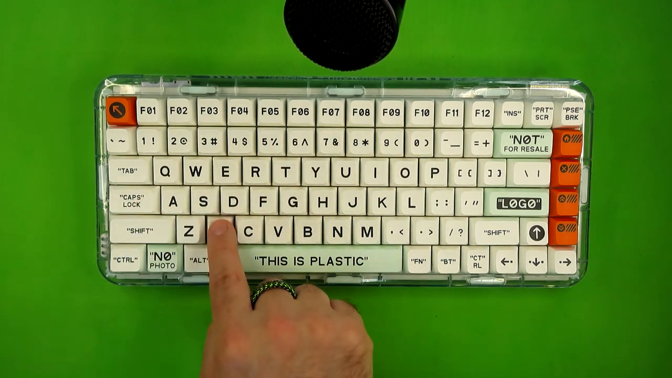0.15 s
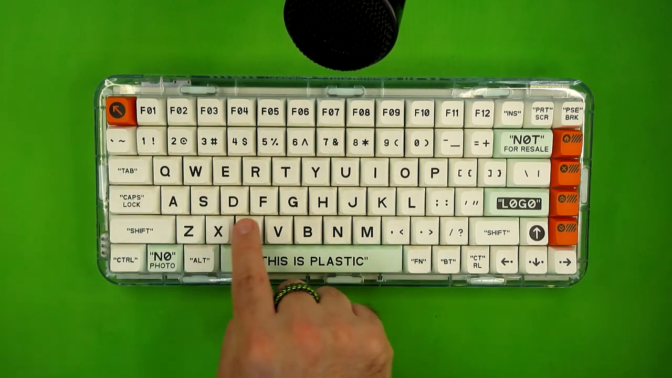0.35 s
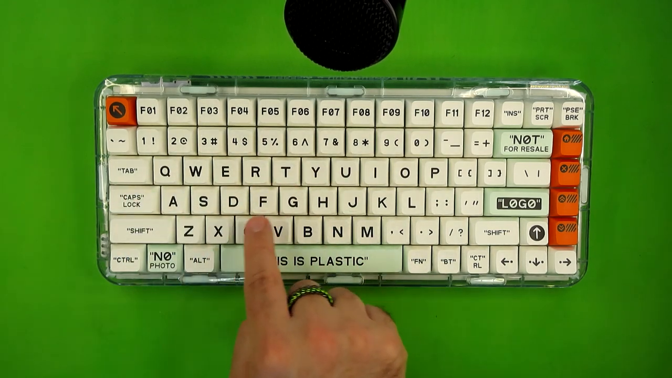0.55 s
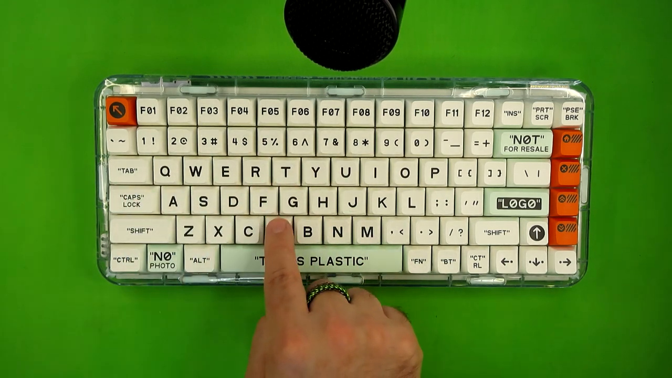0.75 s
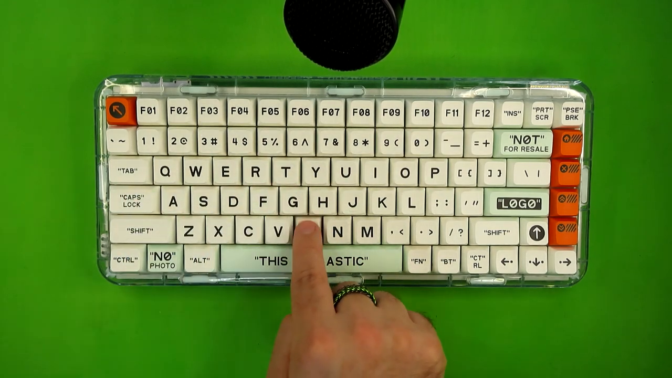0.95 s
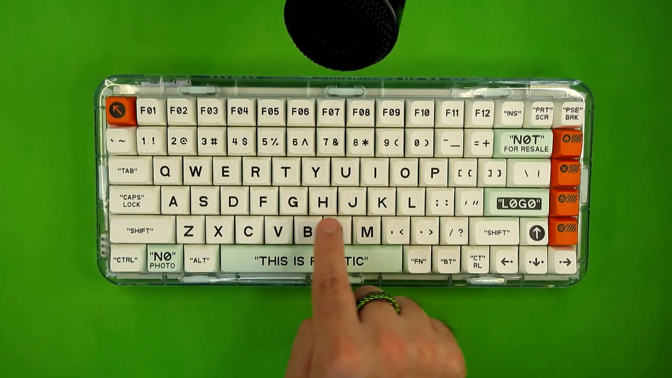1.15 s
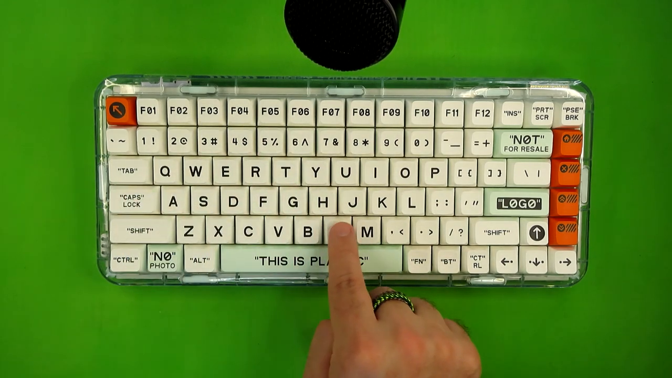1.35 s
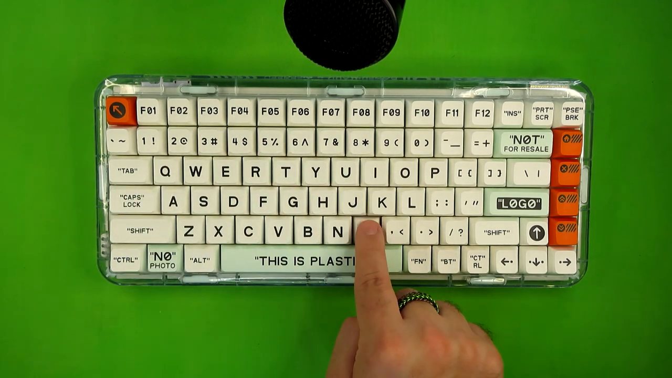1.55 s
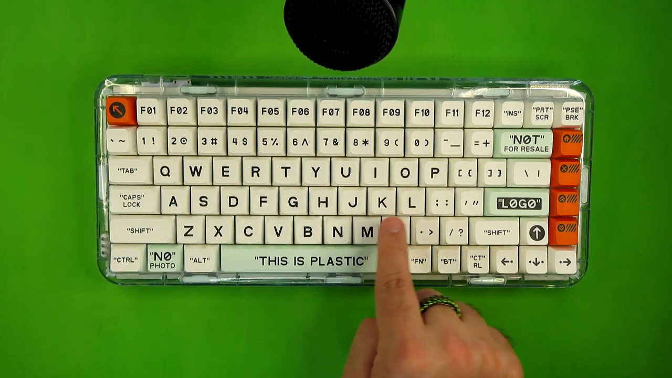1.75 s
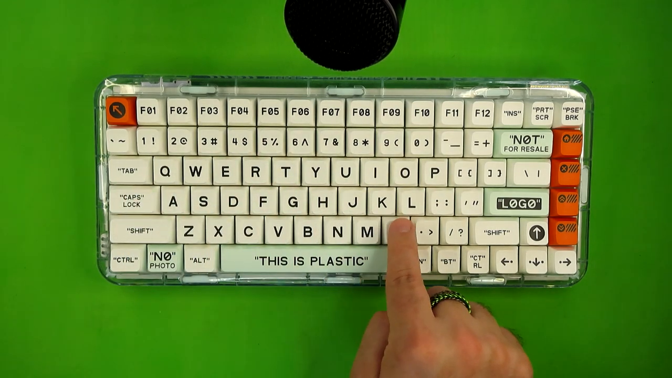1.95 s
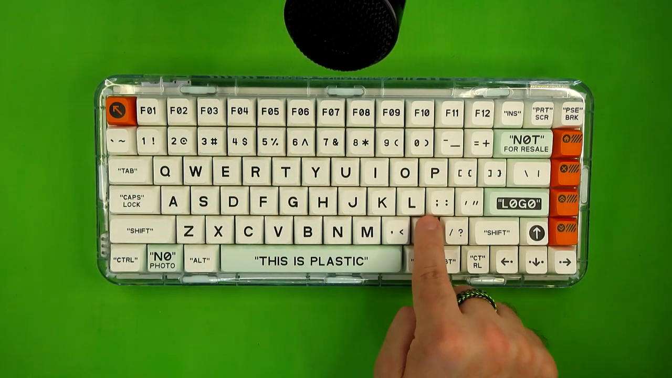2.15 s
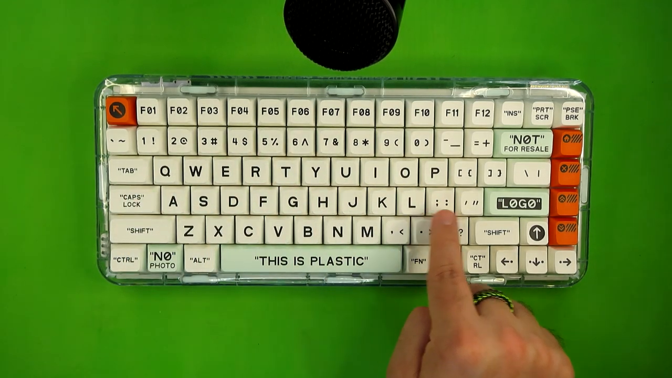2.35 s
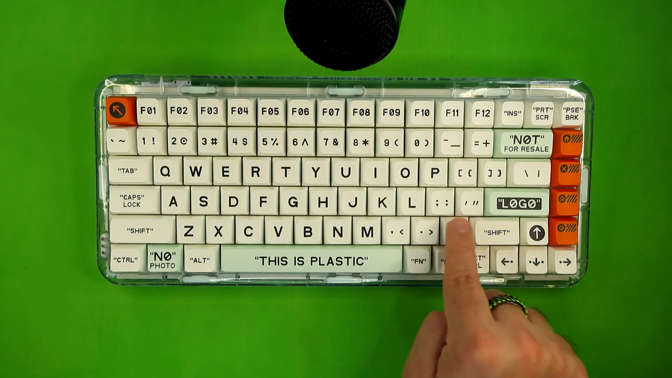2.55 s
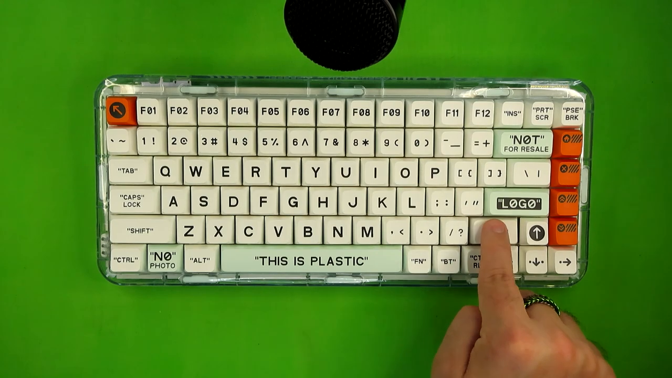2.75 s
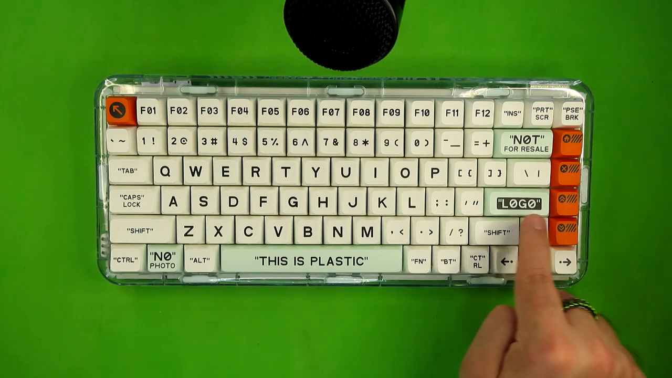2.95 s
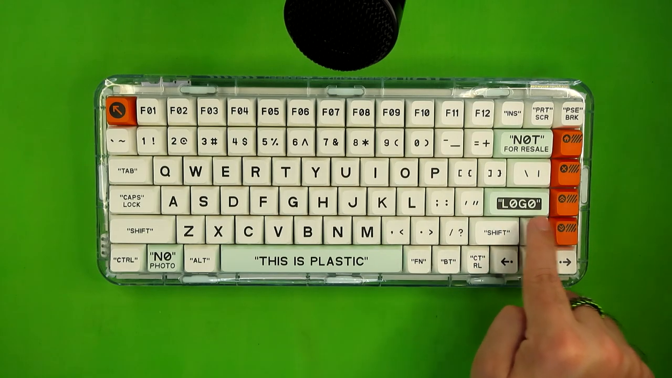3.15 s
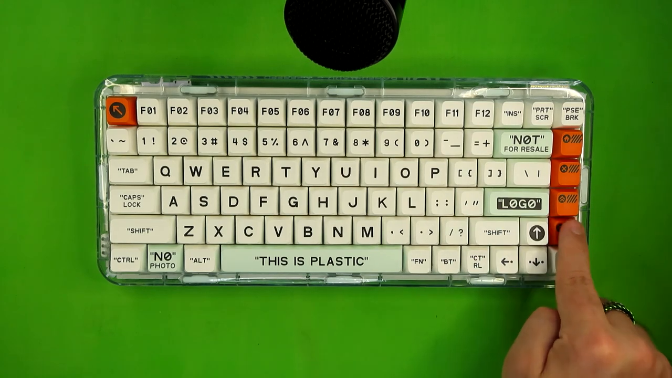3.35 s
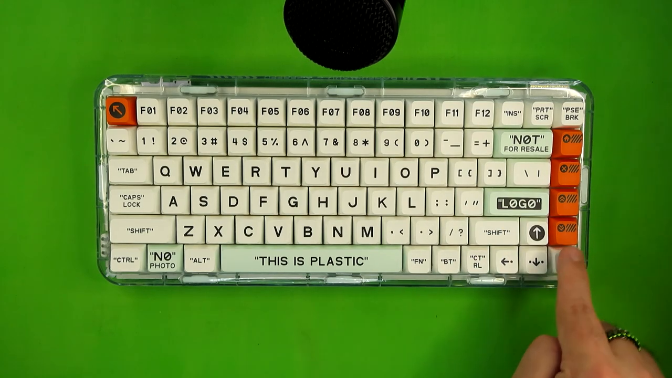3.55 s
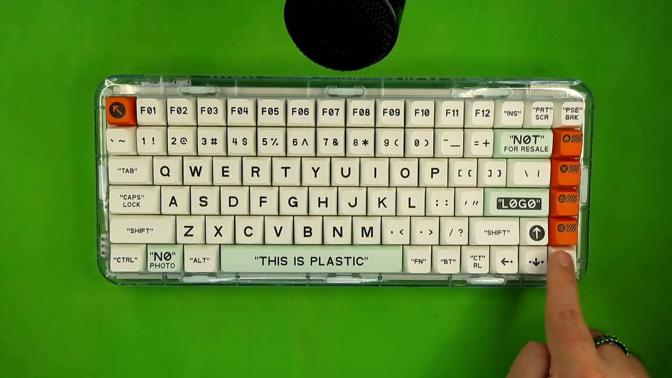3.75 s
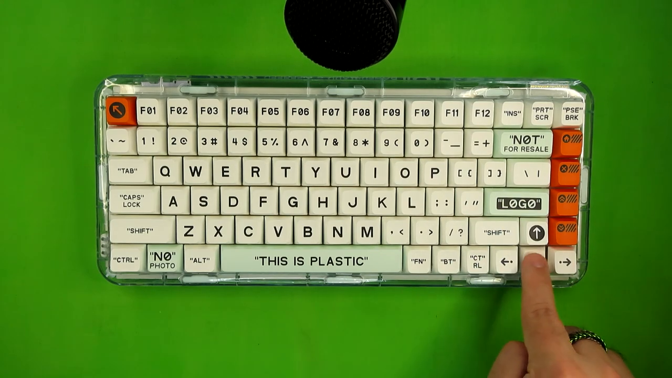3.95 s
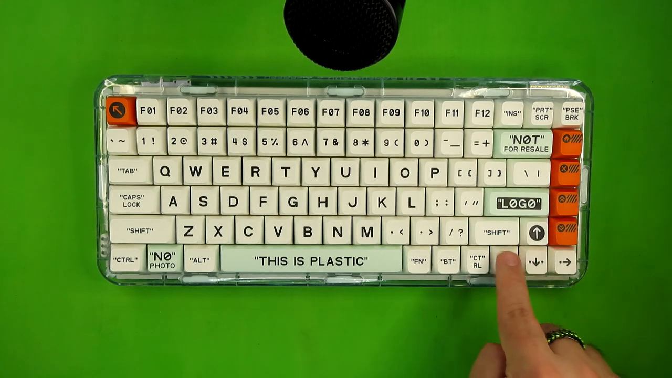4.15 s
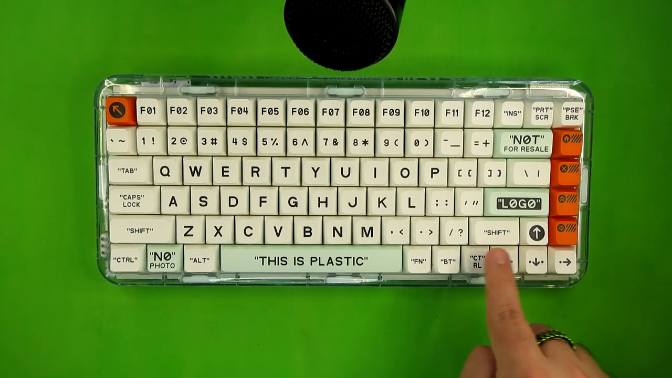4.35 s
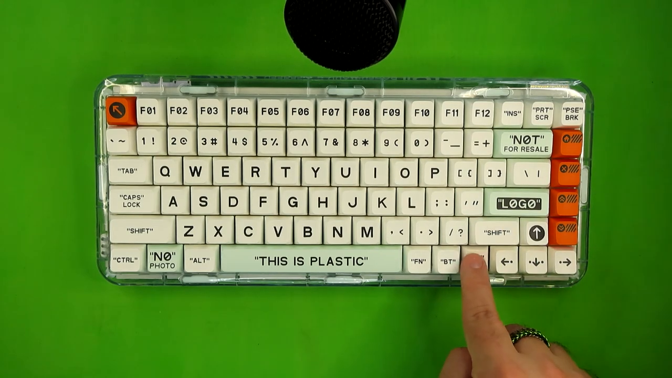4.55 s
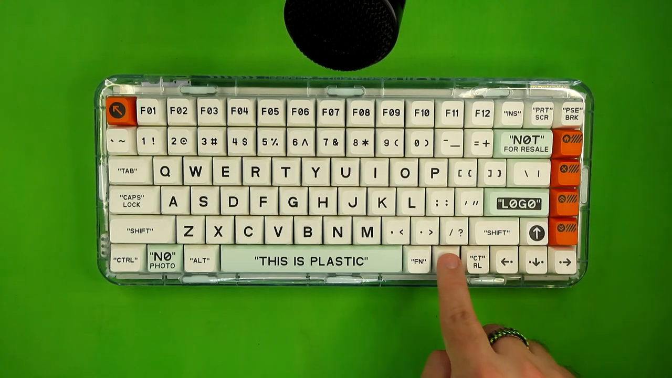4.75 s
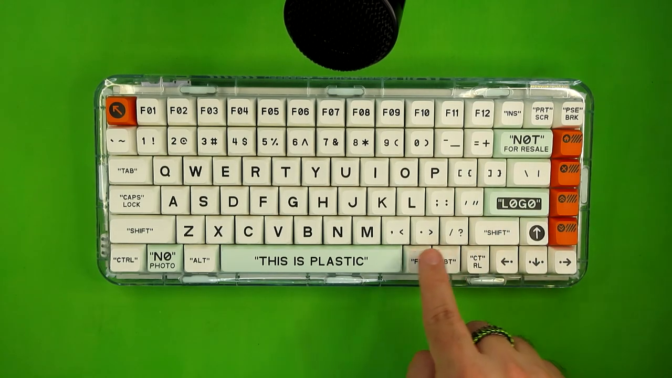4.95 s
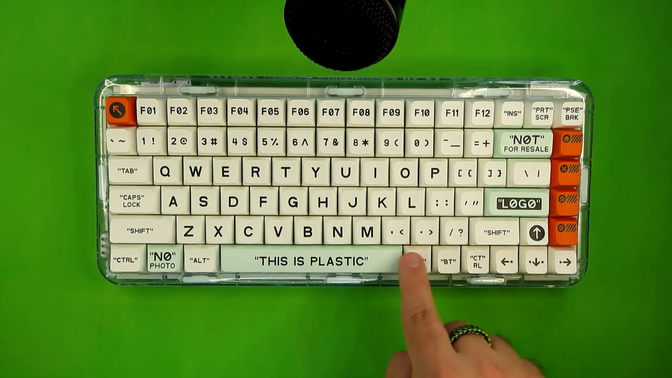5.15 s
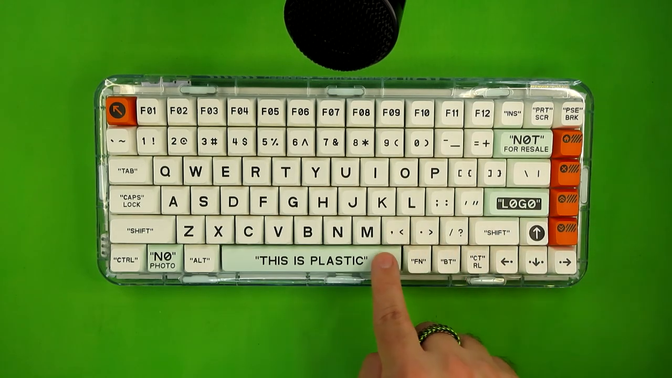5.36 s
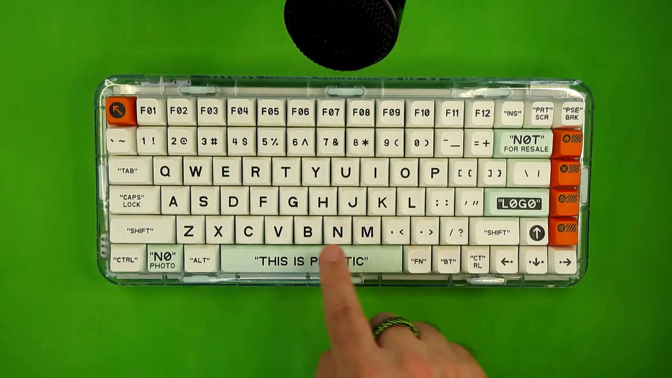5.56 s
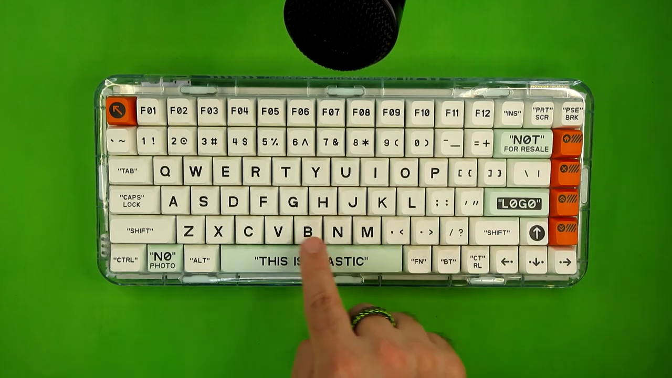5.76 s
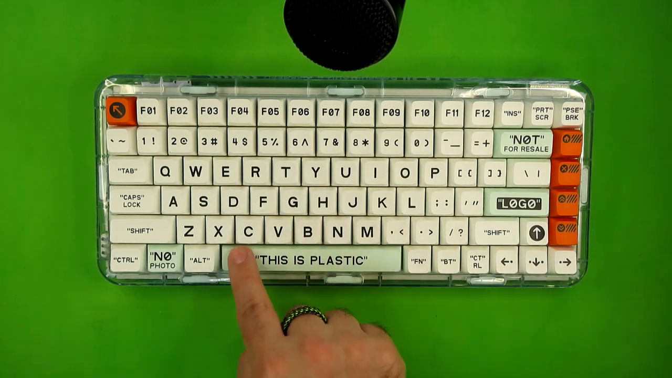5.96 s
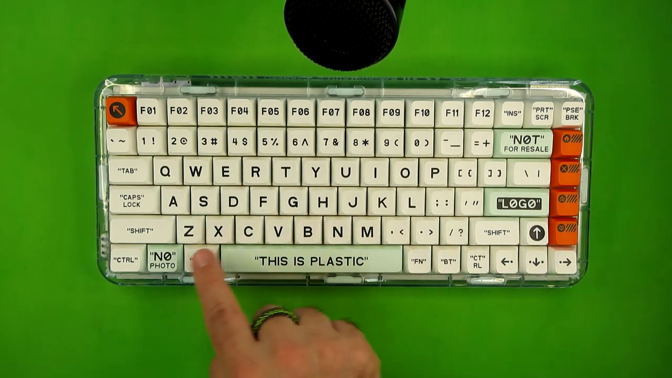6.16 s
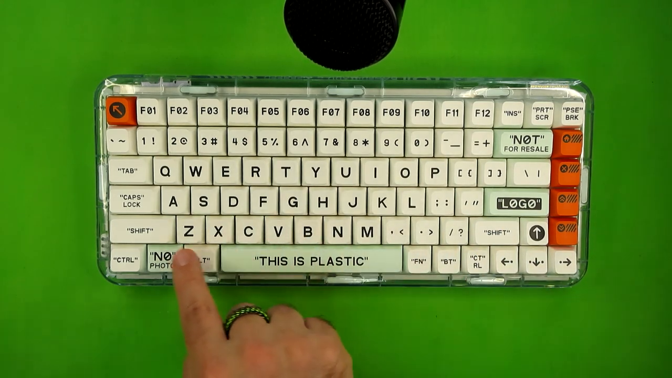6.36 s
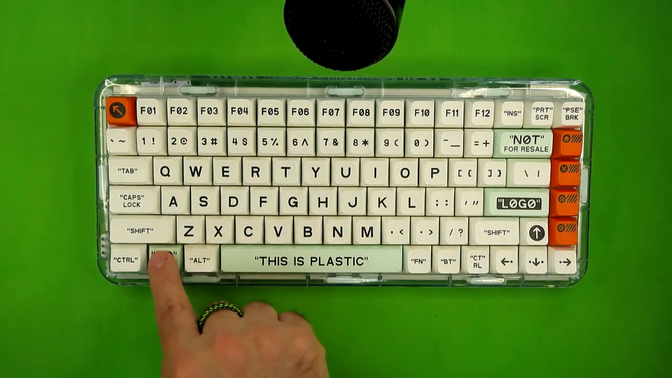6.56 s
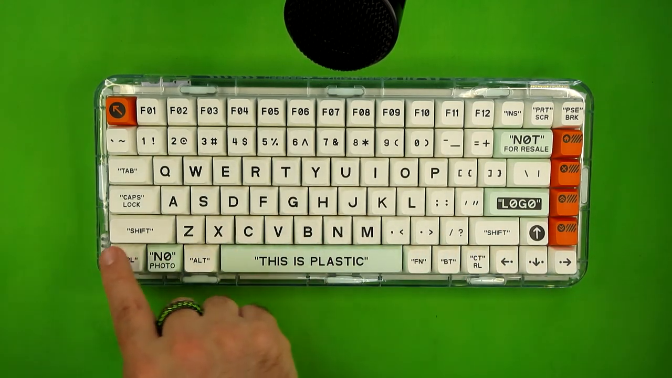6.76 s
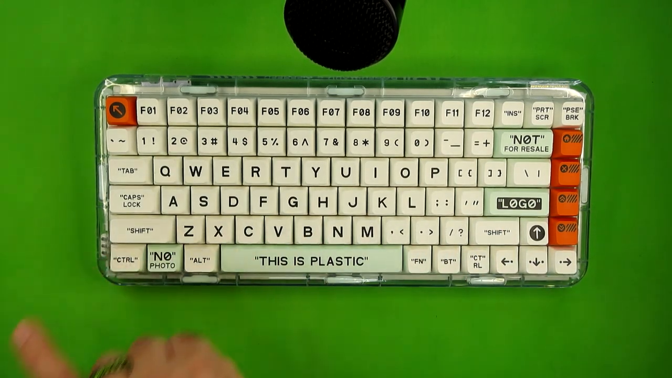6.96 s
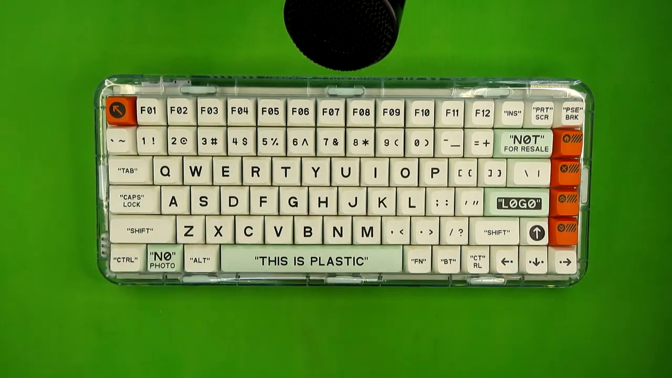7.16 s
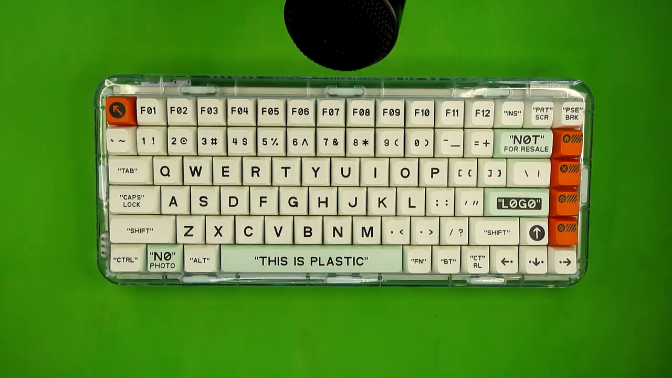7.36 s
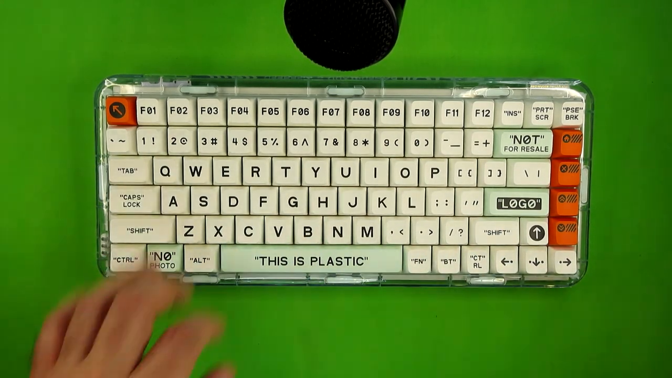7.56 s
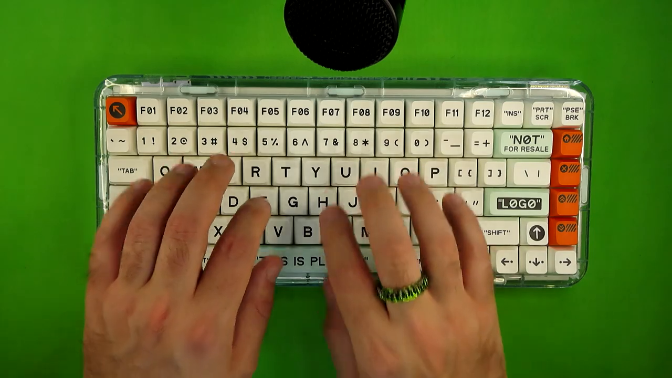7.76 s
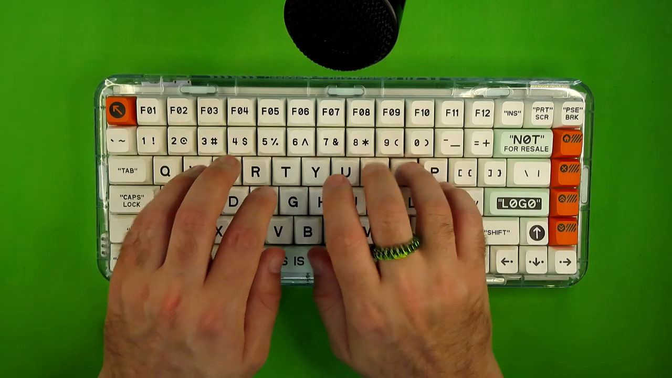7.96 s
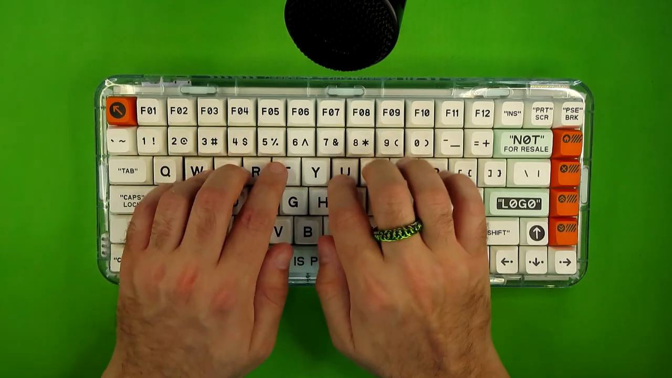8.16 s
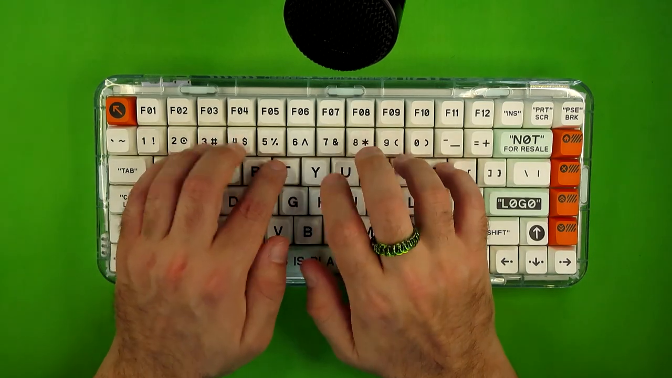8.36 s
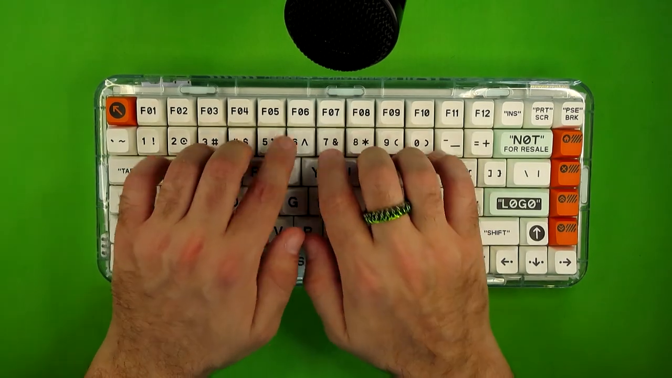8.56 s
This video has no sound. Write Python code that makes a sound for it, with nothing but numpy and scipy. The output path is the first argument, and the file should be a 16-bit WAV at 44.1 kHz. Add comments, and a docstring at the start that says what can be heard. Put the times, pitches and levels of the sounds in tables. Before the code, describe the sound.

Close to a microphone in a small quiet room, a mechanical keyboard sits on a desk over low rumble, soft hiss and a barely audible whine. From 0.15 s one finger presses keys at a regular pace, roughly every 0.3 s: a light fingertip tap, gritty stem slide, sharp plastic clack with a low desk thud, then a lighter clack on release about a tenth of a second later. Strokes from 3.4 to 5.1 s are somewhat duller. Around 5.4 to 6.0 s the space bar gives the loudest, hollowest clunks, with strong returns. Smaller keys follow, clickier, until a last release at 6.93 s. A pause holds only room tone, with a faint dull brush near 7.4 s and complete silence from 7.5 to 7.8 s. From 7.93 s two hands type a fast, uneven burst of firm clacks, overlapping releases and finger scuffs, until about 8.6 s.

```python
"""A mechanical keyboard in a plastic case on a desk, close under a microphone in a small quiet room.
First one finger walks along the keys and over the space bar, over rumble, hiss and a faint whine.
A pause follows, with a soft brush and a short mute; then both hands type a quick burst.
Each stroke is a fingertip tap, the stem sliding, a clack at the bottom that shakes the desk, and a
lighter clack on return. Noise bursts and damped modes make the plastic; low modes make the desk."""
import sys
import numpy as np
from scipy.fft import rfft, irfft, next_fast_len
from scipy.io import wavfile
from scipy.ndimage import uniform_filter1d

SR = 44100
rng = np.random.default_rng(int(sys.argv[2]) if len(sys.argv) > 2 else 0)


def store_pcm(level_fs):
    """Save levels as 16-bit WAV."""
    pcm = np.round(np.clip(level_fs, -1, 1) * 32767).astype(np.int16)
    wavfile.write(sys.argv[1], SR, np.atleast_2d(pcm).T)


N = 379701  # length [samples]


def amp(db):
    """Decibels to gain."""
    return 10 ** (np.asarray(db) / 20)


def unit(x):
    """x at rms 1."""
    return x / np.sqrt(np.mean(x ** 2) + 1e-20)


def burst(x):
    """A short sound scaled to the energy of 10 ms at rms 1."""
    return x / np.sqrt(np.sum(x ** 2) / (SR / 100) + 1e-20)


def clock(length):
    """Sample times over a length in seconds."""
    return np.arange(int(length * SR)) / SR


def fade(t, t60):
    """Exponential decay, 60 dB down after t60 seconds."""
    return np.exp(-np.log(1000) * t / t60)


def along(points, hz):
    """(frequency [Hz], value) points read on a log frequency axis."""
    f, v = np.transpose(points)
    return np.interp(np.log(hz + 1), np.log(f + 1), v)


def over_time(points, t):
    """(time [s], level [dB]) points read at time t."""
    return np.interp(t, *np.transpose(points))


def noise(spectrum, size):
    """Noise of rms 1, coloured by a spectrum."""
    m = next_fast_len(size + 2048)
    gain = amp(along(spectrum, np.fft.rfftfreq(m, 1 / SR)))
    return unit(irfft(rfft(rng.standard_normal(m)) * gain, m)[:size])


def band(x, lo_hz, hi_hz):
    """Causal third-order Butterworth band-pass."""
    m = next_fast_len(len(x) + SR // 100, real=True)
    hz = np.fft.rfftfreq(m, 1 / SR) + 1e-3  # never quite zero
    s = 1j * (hz * hz - lo_hz * hi_hz) / (hz * abs(hi_hz - lo_hz))
    return irfft(rfft(x, m) / ((s + 1) * (s * s + s + 1)), m)[:len(x)]


def band_noise(size, lo_hz, hi_hz):
    """Noise of rms 1 within a band."""
    return unit(band(rng.standard_normal(size), lo_hz, hi_hz))


def add(track, s, x):
    """Mix x into the track from time s."""
    i = max(round(s * SR), 0)
    room_left = track[i:i + len(x)]
    room_left += x[:len(room_left)]


def grainy(x, depth_db):
    """Rough friction: contact comes and goes every few milliseconds."""
    bumps = unit(uniform_filter1d(rng.standard_normal(len(x)), size=110))
    return unit(x * amp(depth_db * bumps))


# the desk swaying under the hand: (time [s], level [dB])
SWAY_LEVEL = [(0, -46), (6.95, -43), (7.2, -50), (7.88, -60.5), (7.98, -40), (8.61, -38)]
# colour of the sway: (frequency [Hz], density [dB per Hz])
SWAY_SPECTRUM = [(10, -12), (22, 3), (38, -6), (60, -18.5), (110, -35.5), (300, -120)]
# colour of the building's rumble: (frequency [Hz], density [dB per Hz])
RUMBLE_SPECTRUM = [(10, -11.5), (25, 5), (55, -11), (80, -25.5), (120, -23), (170, -27.5), (260, -46.5),
                   (1000, -120)]
# colour of the preamplifier hiss: (frequency [Hz], density [dB per Hz])
HISS_SPECTRUM = [(100, 1), (350, -5.5), (1000, -9), (2000, -8.5), (4000, -13), (8000, -15), (16000, -15.5)]
# faint electrical tones: (frequency [Hz], level [dB])
WHINE_TONES = [(1001, -85), (2002, -87), (3000, -93)]


def background():
    """Shaped noise for desk sway, building rumble and preamplifier hiss; steady sines for the whine."""
    t = np.arange(N) / SR
    sway = amp(over_time(SWAY_LEVEL, t)) * noise(SWAY_SPECTRUM, N)
    rumble = amp(-53.5) * noise(RUMBLE_SPECTRUM, N)
    hiss = amp(-75.5) * noise(HISS_SPECTRUM, N)
    whine = sum(np.sqrt(2) * amp(db) * np.sin(2 * np.pi * hz * t) for hz, db in WHINE_TONES)
    return sway + rumble + hiss + whine


def wall(x, delay, db):
    """A nearby surface returns one weak echo, thinned to the middle and upper range."""
    out = np.zeros(N)
    add(out, delay, amp(db) * band(x, 1200, 8200))
    return out


# colour of a stem sliding in its housing: (frequency [Hz], density [dB per Hz])
SLIDE_SPECTRUM = [(150, -15), (400, 2.5), (1000, 0.5), (1800, 2.5), (3000, 0.5), (5000, -6.5), (8000, -9),
                  (9700, -3), (12000, -16), (15000, -18.5)]


def slide(db, length):
    """Gritty friction grows as the stem gathers speed, and stops with it."""
    t = clock(length)
    grit = grainy(noise(SLIDE_SPECTRUM, len(t)), depth_db=3.5)
    return amp(db) * grit * np.sin(np.pi / 2 * t / length) ** 2


def brush():
    """A soft, dull brush in the pause, then fingers skimming the keycaps in the quick burst."""
    out = np.zeros(N)
    swell = np.hanning(int(.11 * SR))
    add(out, 7.38, amp(-60.5) * swell * band_noise(len(swell), 250, 472))
    add(out, 7.38, amp(-78) * swell * band_noise(len(swell), 3800, 5800))
    add(out, 8.02, amp(-67) * grainy(noise(SLIDE_SPECTRUM, int(.6 * SR)), depth_db=7))
    return out


def afterglow(row, db, t60):
    """The diffuse answer of the room, as bright as the stroke, and the shiver of loose neighbouring caps."""
    _, plate_db, _, cap_db, _, snap_db, tick_db, spray_db = row
    t = clock(.22)
    # (low edge [Hz], high edge [Hz], relative level [dB])
    bands = [(560, 1700, plate_db + 1.5), (1390, 3100, cap_db - 1), (3540, 8200, snap_db + 2),
             (8200, 11200, tick_db - 0.5), (11200, 15500, spray_db)]
    tail = sum(amp(level) * band_noise(len(t), lo, hi) for lo, hi, level in bands)
    shiver = amp(cap_db / 2 - 17) * grainy(noise(SLIDE_SPECTRUM, len(t)), depth_db=2.5)
    return amp(db) * (tail + shiver) * fade(t, t60)


# colour of a fingertip on a keycap: (frequency [Hz], density [dB per Hz])
TAP_SPECTRUM = [(200, -20.5), (600, -4.5), (1100, -4), (2000, 0), (4000, -7), (7000, -13.5), (9700, -9.5),
                (12000, -19.5), (16000, -23.5)]


def fingertip(db):
    """A fingertip knocks the loose keycap against its stem, then scuffs it briefly."""
    t = clock(.06)
    knock_and_scuff = fade(t, 0.0099) + amp(-15) * fade(t, 0.058)
    return amp(db) * burst(noise(TAP_SPECTRUM, len(t)) * knock_and_scuff)


def ping(hz, db):
    """A narrow ring that outlasts the clack."""
    t = clock(.25)
    return amp(db) * band_noise(len(t), .985 * hz, 1.015 * hz) * fade(t, 0.12)


# fingers grazing keys without pressing them: (time [s], level [dB])
GRAZES = [(7.928, -51.5), (8.087, -50), (8.303, -53.5), (8.428, -45), (8.602, -49)]
# further narrow rings that linger after a stroke, like the springs': (time [s], frequency [Hz], level [dB])
LINGERING_RINGS = [(3.093, 1700, -60), (3.209, 1700, -61), (6.684, 1750, -53.5)]


def strays():
    """Fingertips grazing keys in the quick burst, and a few further narrow rings that linger."""
    out = np.zeros(N)
    for s, db in GRAZES:
        add(out, s, fingertip(db))
    for s, hz, db in LINGERING_RINGS:
        add(out, s, ping(hz, db))
    return out


def ring(modes, t, spread):
    """Damped modes of alternating sign, a little different in pitch and strength at every blow."""
    waves = []
    for hz, db, t60 in modes:
        strength = amp(db + rng.normal(0, 1))
        pitch = hz * np.exp(rng.normal(0, spread))
        waves.append(strength * fade(t, t60) * np.sin(2 * np.pi * pitch * t))
    return sum(waves[1::2]) - sum(waves[::2])


# the keyboard bouncing on its feet, and the desk under it:
# (frequency [Hz], relative level [dB], decay t60 [s])
DESK_MODES = [(22, 5, .47), (30, 1.5, .2), (122, -4, .11), (62, 3, .06), (162, -6, .04)]


def thud(db, rise):
    """The push of a key rocks the keyboard; the desk answers with a crowd of low modes."""
    t = clock(.5)
    boards = band_noise(len(t), 58, 125) * fade(t, 0.29)
    # a hard stroke drives the keyboard deep into its rubber feet: db counts twice here
    feet = amp(db + 26) * np.sin(2 * np.pi * 72 * t) * fade(t, .06)
    body = ring(DESK_MODES, t, spread=0.035) + feet + amp(-10) * boards
    return amp(db) * body * (1 - np.exp(-t / rise))


RING_LENGTH = .03  # a plastic part is cut off after this [s]


def part(lo_hz, hi_hz, t60, modes, blow_db):
    """One plastic part: the blow, a crowd of damped modes, and leading (Hz, dB) modes that ring longer."""
    t = clock(RING_LENGTH)
    blow = burst(band(1. * (t == 0), lo_hz, hi_hz))
    crowd = burst(band(rng.standard_normal(len(t)) * fade(t, t60), lo_hz, hi_hz))
    lead = 0
    for hz, db in modes:
        tone = np.cos(2 * np.pi * hz * t) * fade(t, 1.25 * t60)
        lead = lead + amp(db) * burst(band(tone, lo_hz, hi_hz))
    return burst(crowd + amp(blow_db) * blow + lead)


# air and walls of the case: (frequency [Hz], relative level [dB], decay t60 [s])
CASE_MODES = [(229.9, 5.5, 0.026), (287, -14, 0.06), (420, -1.5, 0.017)]


def clack(row, plate_t60, cap_t60, stem_t60, blow_db, hollow_db):
    """A stem strikes its stop: case, plate, keycap and switch ring for a few milliseconds."""
    case_db, plate_db, plate_hz, cap_db, cap_hz, snap_db, tick_db, spray_db = row
    air = burst(band(ring(CASE_MODES, clock(RING_LENGTH), spread=.08), 110, 630))
    walls = part(160, 600, 0.037, [(200, -0.5)], blow_db=1)
    hollow = amp(case_db + hollow_db) * burst(air + amp(-1.5) * walls)
    plate_lo_hz = 0.66 * min(plate_hz, 1150)
    plate_modes = [(plate_hz, 6.5), (1010, -3)]
    plate = amp(plate_db) * part(plate_lo_hz, 1480, plate_t60, plate_modes, blow_db - 5)
    cap = amp(cap_db) * part(1500, 3450, cap_t60, [(cap_hz, 3.5), (3150, -5)], blow_db + 2)
    # the small, stiff parts of the switch give mostly the bare blow
    snap = amp(snap_db) * part(3700, 7300, stem_t60, [], blow_db + 7)
    tick = amp(tick_db) * part(8300, 11100, stem_t60, [(9550, -3)], blow_db + 2)
    spray = amp(spray_db) * part(11800, 15500, stem_t60, [(14400, -9)], blow_db + 3)
    return hollow + plate + cap + snap + tick + spray


ORDINARY_DB = -35  # force of an ordinary stroke
WEIGHT_OF_FORCE, WEIGHT_OF_HARDNESS = .35, .33  # dB of thud and case per dB of force and of hardness


def weight(force_db, hard_db):
    """How much of a blow gets past the switch into case and desk, in dB over an ordinary stroke."""
    return WEIGHT_OF_FORCE * (force_db - ORDINARY_DB) + WEIGHT_OF_HARDNESS * hard_db


# kinds of key, base settings at an ordinary stroke: kind -> (finger travel [s], tap [dB],
# desk thud [dB], desk thud on return [dB], hollow case [dB])
KEY_BODY = {"low": (.017, -55, -32, -44, -54), "right": (.017, -55, -32, -47, -55.5),
            "space": (.016, -44, -32.5, -28.5, -34), "corner": (.015, -51, -31.5, -44, -49.5),
            "upper": (.009, -42, -27.5, -46, -52.5)}
# their switches, relative to the keycap: kind -> (stem snap [dB], housing tick [dB],
# contact spray [dB], spring pitch [Hz], spring [dB])
KEY_SWITCH = {"low": (-6.5, -9.5, -16.5, 1750, -31), "right": (-5, -8.5, -20, 1850, -29),
              "space": (-9.5, -14, -9, 3330, -26), "corner": (-1, -14.5, -16, 7600, -25.5),
              "upper": (-9.5, -7.5, -15, 2400, -27)}
# growth with hardness: (stem snap [dB per dB], housing tick [dB per dB], contact spray [dB per dB])
HARD_GROWS = (.7, .9, 1.35)


def stroke(force_db, hard_db, plate_db, plate_hz, cap_hz, kind):
    """How a blow is shared: force drives all the parts, hardness tilts the switch towards the treble."""
    case_db = KEY_BODY[kind][4] + weight(force_db, hard_db)
    switch_db = KEY_SWITCH[kind][:3]
    treble = [force_db + db + grows * hard_db for db, grows in zip(switch_db, HARD_GROWS)]
    return (case_db, force_db + plate_db, plate_hz, force_db, cap_hz, *treble)


def spring(force_db, kind):
    """Thin steel rings much longer than the plastic around it."""
    hz, db = KEY_SWITCH[kind][3:]
    return ping(hz, force_db + db)


# keys springing back, each ringing like the key last pressed:
# (time [s], force [dB], hardness [dB], plate over keycap [dB])
RELEASES = [(.259, -41, .5, -4), (.5579, -39, -7.5, -8.5), (.832, -39.5, 2, -1), (1.1196, -38.5, .5, -6),
            (1.4163, -42.5, -1.5, -2.5), (1.7198, -41.5, .5, 1.5), (2.0279, -40, -5, -3),
            (2.3375, -37.5, 1.5, -5.5), (2.613, -36.5, 3, -4), (2.9118, -41, 3, 7), (3.2092, -37, -2.5, 0),
            (3.4863, -36.5, -9, -6.5), (3.7858, -40.5, -5.5, 3), (4.0651, -37.5, -7, -.5),
            (4.3422, -36.5, 2.5, -1), (4.641, -36.5, -3, -10.5), (4.9313, -36, -11, -14),
            (5.212, -34, -11, -12.5), (5.476, -32, -5, -2.5), (5.77, -38, -8, -1.5), (6.0957, -34, -3, 0),
            (6.3935, -37.5, -2, 1), (6.6836, -35.5, -5, -4), (6.9286, -31.5, 3, -2), (8.026, -42.5, 2, 5),
            (8.2166, -36, 5, -8), (8.2363, -45.5, 1, -5.5), (8.2867, -35.5, 0, -15),
            (8.3225, -34, -11, -11), (8.3336, -44.5, 4, 4), (8.381, -45, -2, -3), (8.4809, -44, -6.5, -1),
            (8.4956, -34, -10, -11), (8.5065, -41, -1.5, -15), (8.5672, -40, -10, -2)]
# the keycap ticks under the lifting finger: lead on the return [s], level re the tap [dB]
LIFT_S, LIFT_DB = .014, -12
FREE_CAP_HZ = 2000  # without the finger on it, a keycap rings halfway to this pitch
# plate pitch ratio without the finger; log spread of plate and cap from one return to the next
RETURN_PITCH, PITCH_SCATTER = .96, .025


def releases():
    """The finger lifts, the stem slides up and strikes its top stop."""
    plastic, desk = np.zeros(N), np.zeros(N)
    for s, force_db, hard_db, plate_db in RELEASES:
        last_pressed = [key for key in PRESSES if key[0] < s][-1]
        *_, plate_hz, cap_hz, kind = last_pressed
        _, tap_db, _, thud_db, _ = KEY_BODY[kind]
        plate_shift, cap_shift = np.exp(PITCH_SCATTER * rng.standard_normal(2))
        free_plate_hz = RETURN_PITCH * plate_shift * plate_hz
        free_cap_hz = cap_shift * np.sqrt(cap_hz * FREE_CAP_HZ)
        row = stroke(force_db, hard_db, plate_db, free_plate_hz, free_cap_hz, kind)
        add(plastic, s - LIFT_S, fingertip(tap_db + LIFT_DB))
        add(plastic, s - .028, slide(force_db / 2 - 40.5, .028))
        add(plastic, s, clack(row, plate_t60=0.023, cap_t60=0.013, stem_t60=0.011,
                              blow_db=-7, hollow_db=-3))
        add(plastic, s, afterglow(row, db=-23.5, t60=.22))
        add(plastic, s, spring(force_db + 2.5, kind))
        add(desk, s, thud(thud_db - 1.5, rise=0.005))
    return plastic, desk


# keys hitting bottom: (time [s], force [dB], hardness [dB], plate over keycap [dB],
# plate pitch [Hz], keycap pitch [Hz], kind of key)
PRESSES = [(.1533, -39, 5.5, -2, 1165, 2150, "low"), (.4421, -35.5, 1.5, -9, 1124, 1810, "low"),
           (.727, -35.5, 5, -5, 1196, 3550, "low"), (1.015, -32, 0, -10.5, 1210, 1980, "low"),
           (1.3191, -39.5, -6, -7.5, 1170, 1670, "low"), (1.5927, -33.5, 3, -6, 1060, 2970, "low"),
           (1.9041, -42, .5, -4.5, 1130, 2540, "low"), (2.2144, -40, 1, -.5, 1160, 2480, "low"),
           (2.4944, -35, 6.5, -1.5, 1260, 2540, "low"), (2.7991, -33.5, 2.5, 2.5, 1056, 2080, "low"),
           (3.0931, -34, 1, -1, 1077, 2130, "low"), (3.3811, -33, -9, -4, 1230, 2020, "right"),
           (3.6815, -29.5, -6.5, -4.5, 1074, 2090, "right"), (3.965, -31, -1, -8, 1120, 2060, "right"),
           (4.2485, -30.5, -3, -6, 1076, 1990, "right"), (4.5383, -34, -2.5, -4, 1040, 2096, "right"),
           (4.8345, -37, -10.5, -9, 1256, 1940, "right"), (5.13, -29, -8, -13.5, 910, 1890, "right"),
           (5.3952, -23.5, -1, -7, 1310, 1860, "space"), (5.6906, -22.5, -2.5, -6.5, 1310, 1810, "space"),
           (6.0164, -29.5, 1.5, -.5, 1254, 1720, "space"), (6.312, -28.5, -3, -7.5, 1300, 3360, "corner"),
           (6.602, -33, 4.5, -5.5, 783, 1934, "corner"), (6.8736, -37, 4, 2, 900, 1540, "corner"),
           (7.9466, -26, 5.5, -13, 1100, 2124, "upper"), (8.0516, -32, -.5, -7.5, 1240, 2630, "upper"),
           (8.1405, -29, 3, -14, 960, 2210, "upper"), (8.1644, -42, 5, 4, 940, 2200, "upper"),
           (8.4512, -35.5, -4, -6, 880, 2450, "upper"), (8.5471, -27, 0, -9.5, 1200, 2500, "upper")]
# weight of the hand behind the finger: (time [s], level [dB])
HAND_WEIGHT = [(0, 1.5), (1.5, 2.5), (1.9, -2.5), (2.6, -2), (3.3, 2), (4, -2.5), (5.3, -1), (6, .5)]
TRAVEL_HALVES_DB = 25  # this much more force halves the finger's travel time
TAP_MERGES = .45  # in a firm push the tap merges into the stroke: dB lost per dB of force


def presses():
    """The finger taps the cap, the stem slides down and lands; a faster finger arrives sooner and harder."""
    plastic, desk = np.zeros(N), np.zeros(N)
    for s, force_db, hard_db, plate_db, plate_hz, cap_hz, kind in PRESSES:
        travel, tap_db, thud_db = KEY_BODY[kind][:3]
        extra_db = force_db - ORDINARY_DB
        thud_db += weight(force_db, hard_db) + over_time(HAND_WEIGHT, s)
        landing = s - travel * 2 ** (-extra_db / TRAVEL_HALVES_DB)  # finger meets cap
        row = stroke(force_db, hard_db, plate_db, plate_hz, cap_hz, kind)
        add(plastic, landing, fingertip(tap_db - TAP_MERGES * extra_db))
        # friction grows more slowly with stroke speed than the blow does
        add(plastic, s - .032, slide(force_db / 2 - 39.5, .032))
        add(plastic, s, clack(row, plate_t60=.017, cap_t60=0.0095, stem_t60=.01,
                              blow_db=-5, hollow_db=1))
        add(plastic, s, afterglow(row, db=-25, t60=0.28))
        add(plastic, s, spring(force_db - 1.5, kind))
        add(desk, s, thud(thud_db + 3.0, rise=0.0012))
        # the landing finger nudges the keyboard before the stem lands
        add(desk, landing - .002, amp(thud_db - 3) * np.hanning(int(.008 * SR)))
    return plastic, desk


def scene():
    """Keyboard, desk and room summed at one microphone."""
    plastic, desk = np.add(presses(), releases())
    near = plastic + strays() + brush()
    echo = wall(near, delay=0.015, db=-28.5)
    return (near + echo + desk + background())[None]


# the mute in the pause: (start [s], end [s])
MUTE = (7.507, 7.812)
TOP_HZ = 16600  # band limit


def record(dry):
    """The sound is muted briefly in the pause, and nothing passes above the band limit."""
    t = np.arange(N) / SR
    open_gate = 1. * ((t < MUTE[0]) | (t > MUTE[1]))
    live = uniform_filter1d(open_gate, size=256)  # soft edges
    m = next_fast_len(N + SR // 2)
    passes = np.fft.rfftfreq(m, 1 / SR) < TOP_HZ
    return irfft(rfft(dry * live, m) * passes, m)[..., :N]


dry = scene()
out = record(dry)
store_pcm(out)
```